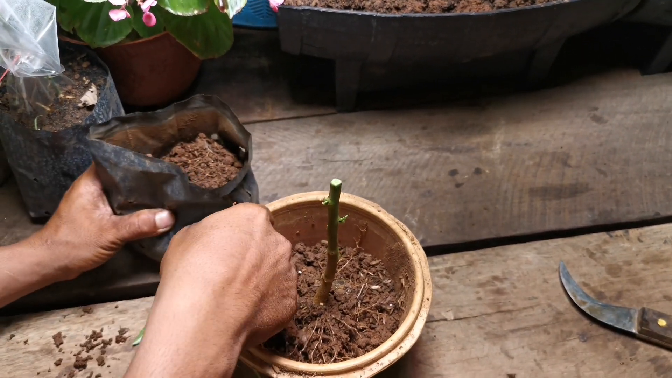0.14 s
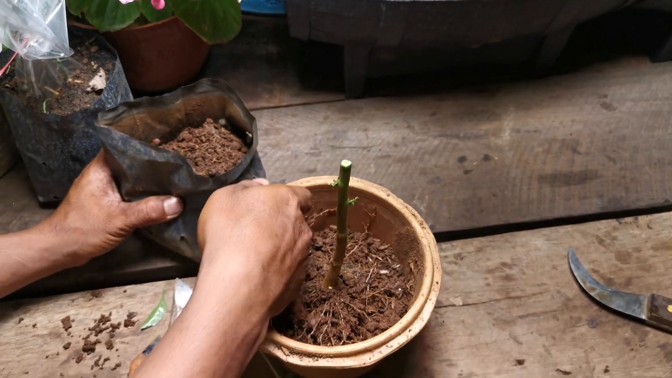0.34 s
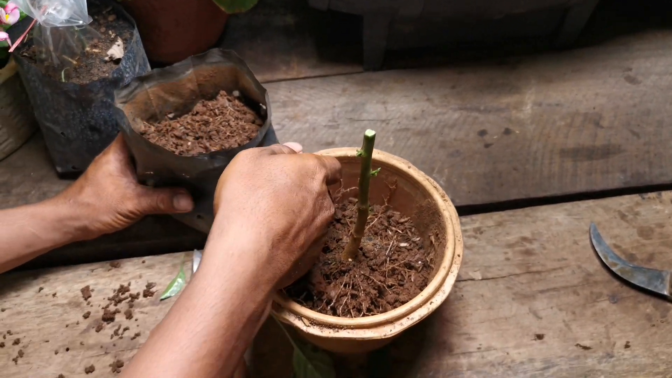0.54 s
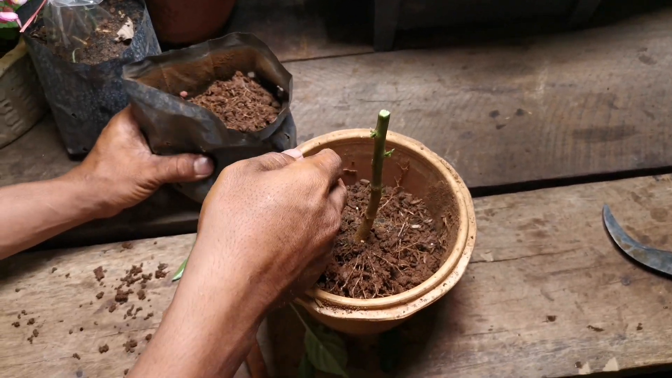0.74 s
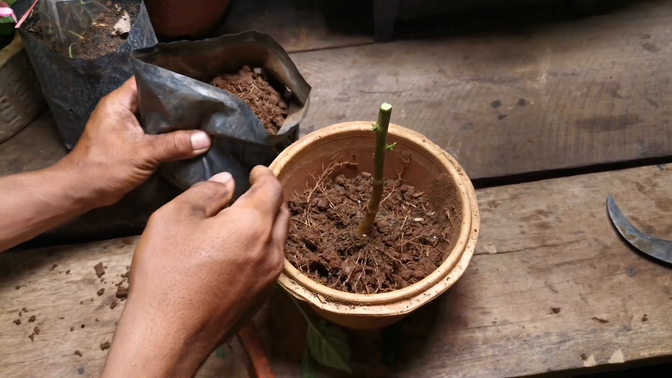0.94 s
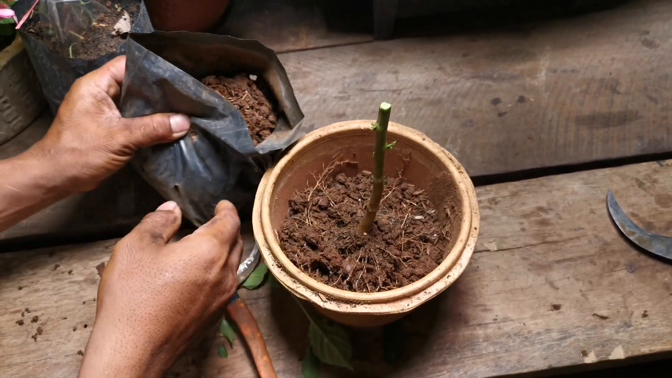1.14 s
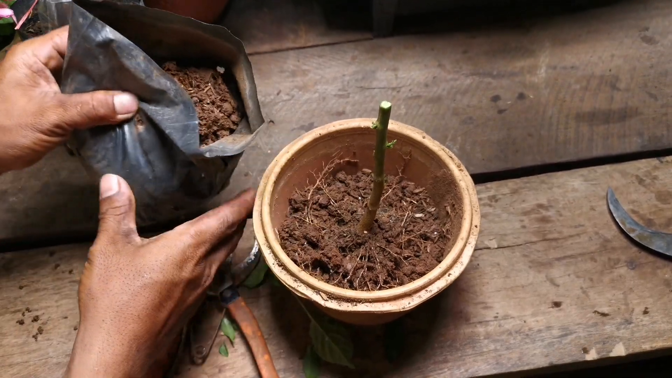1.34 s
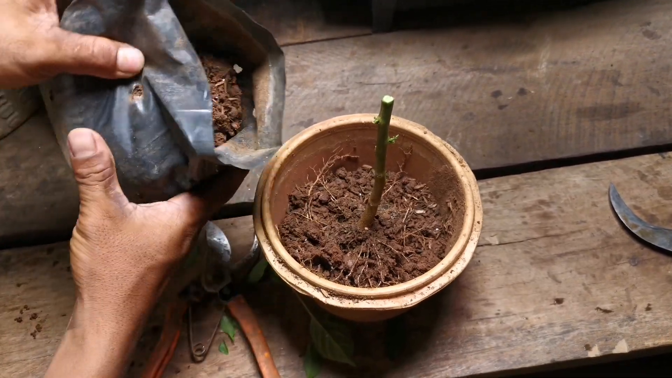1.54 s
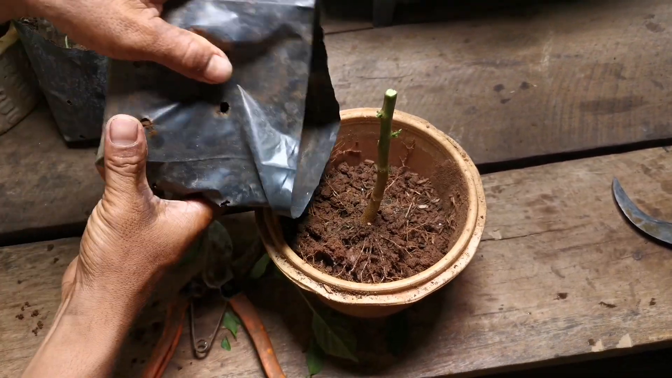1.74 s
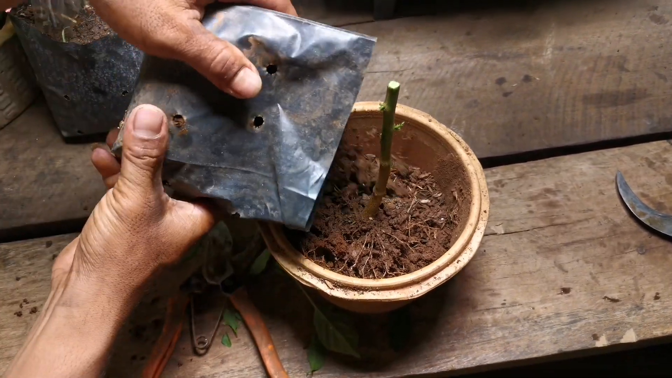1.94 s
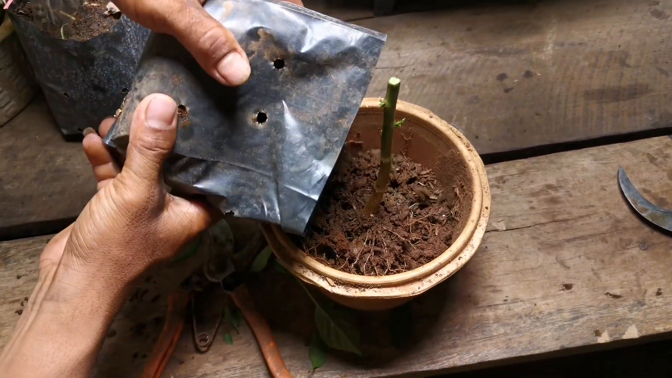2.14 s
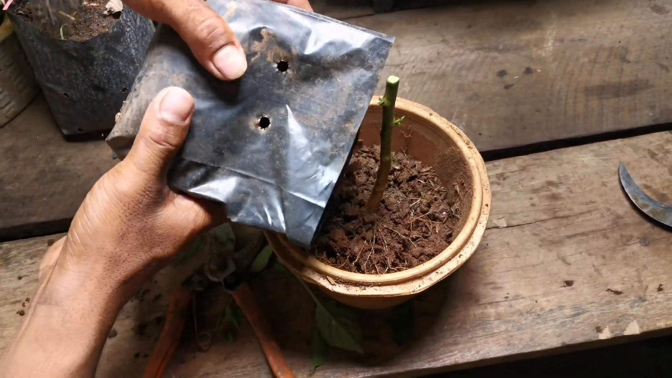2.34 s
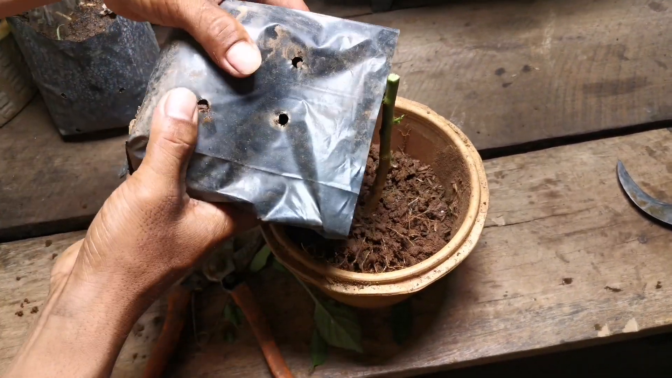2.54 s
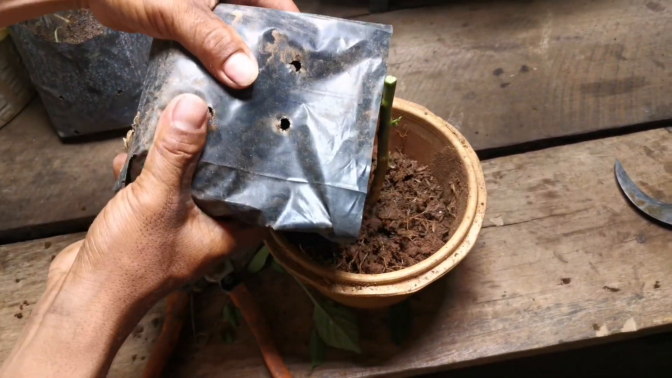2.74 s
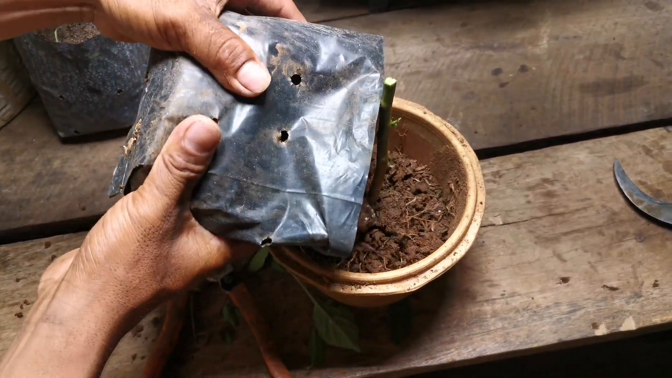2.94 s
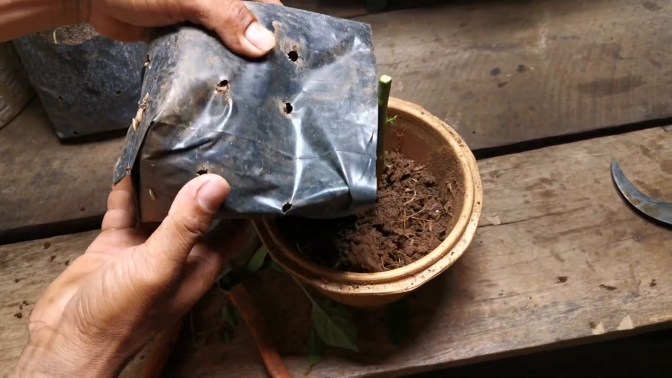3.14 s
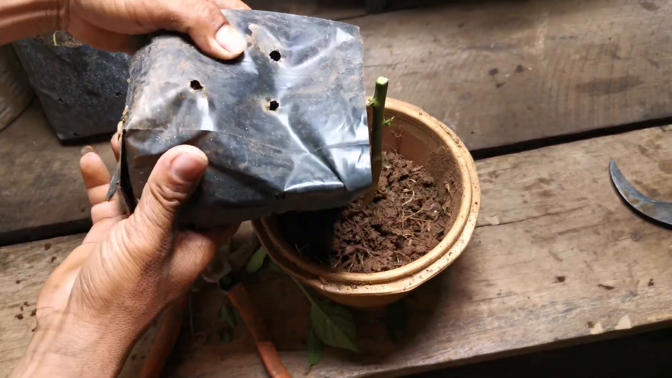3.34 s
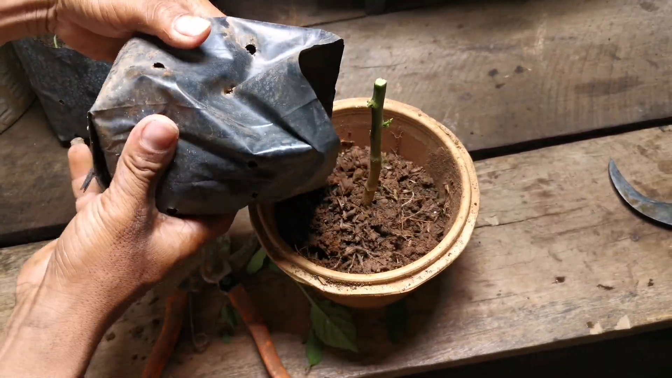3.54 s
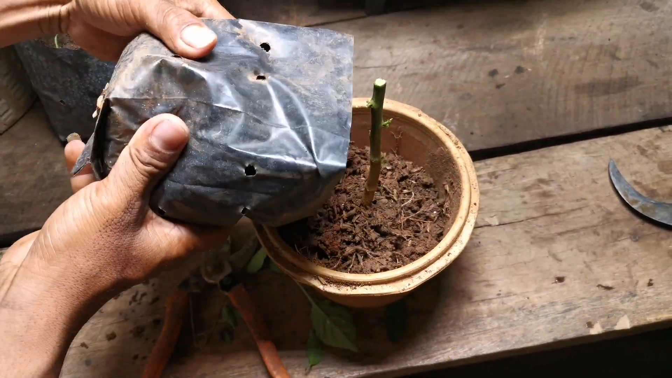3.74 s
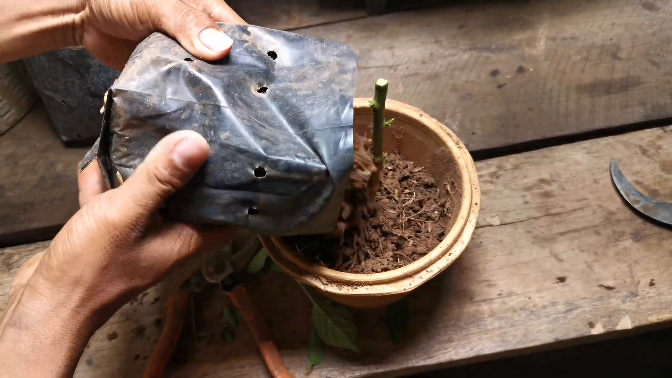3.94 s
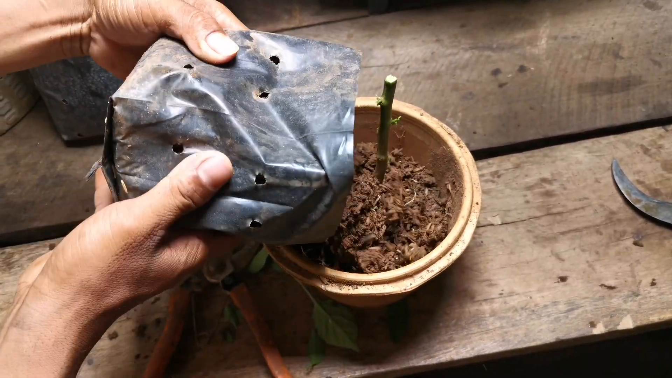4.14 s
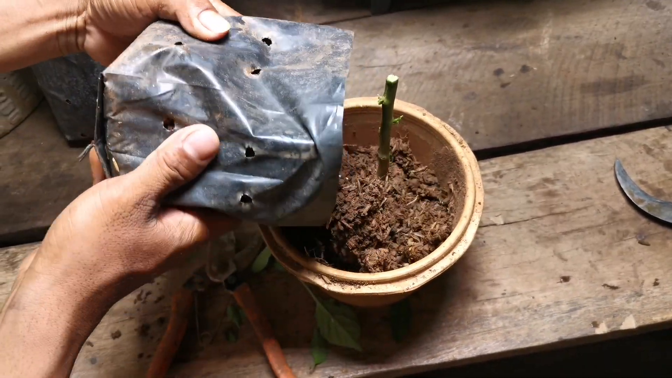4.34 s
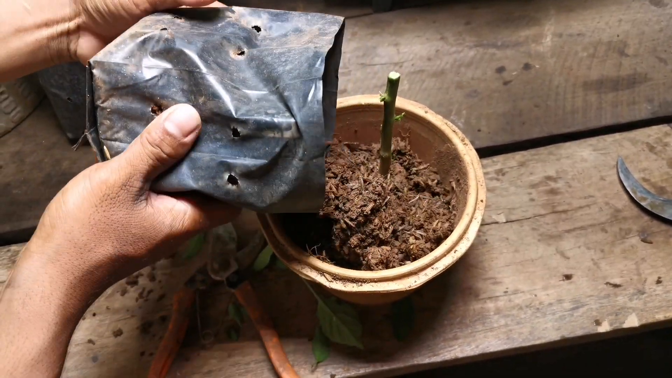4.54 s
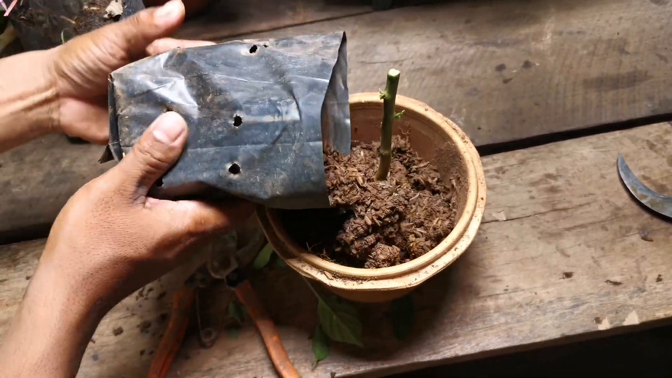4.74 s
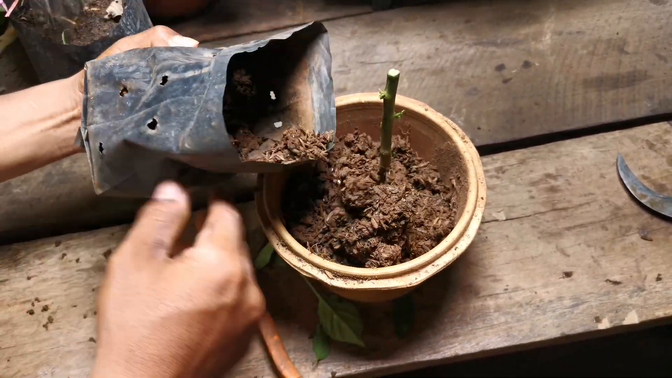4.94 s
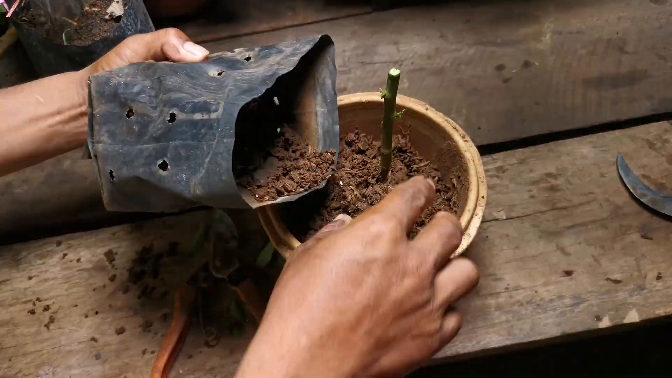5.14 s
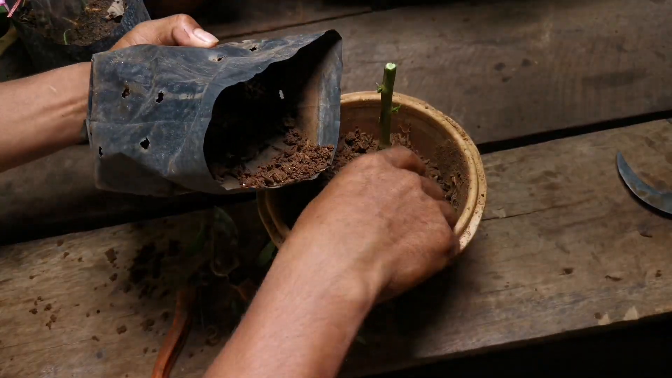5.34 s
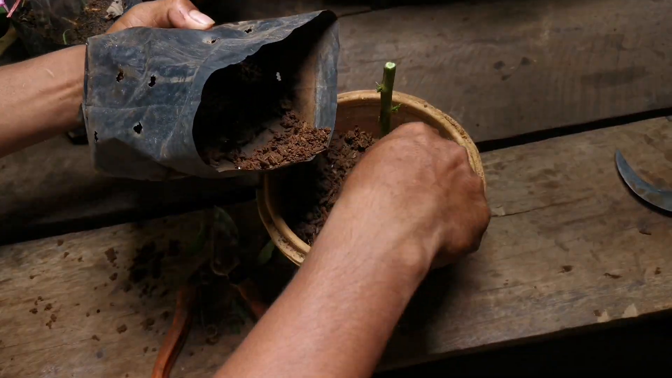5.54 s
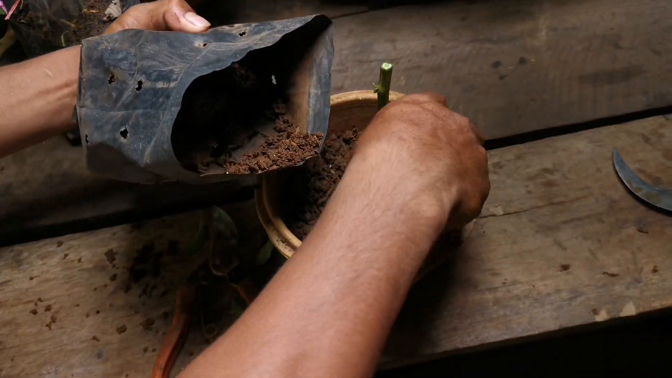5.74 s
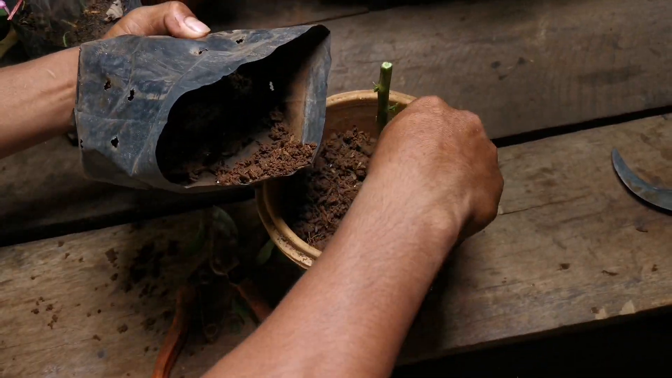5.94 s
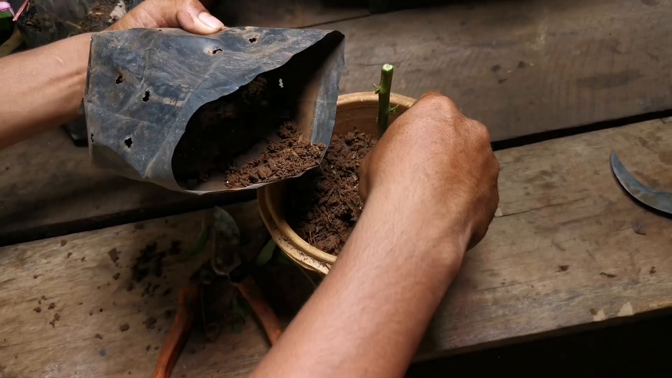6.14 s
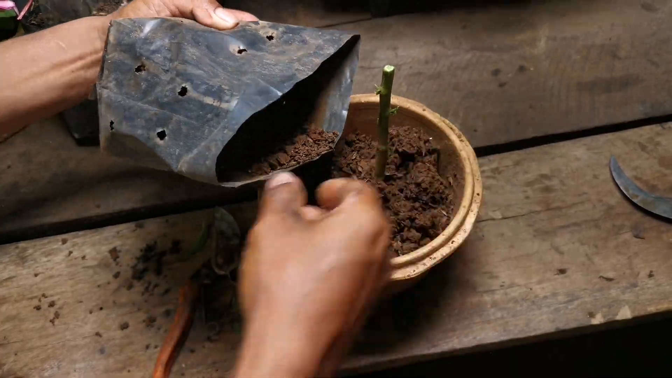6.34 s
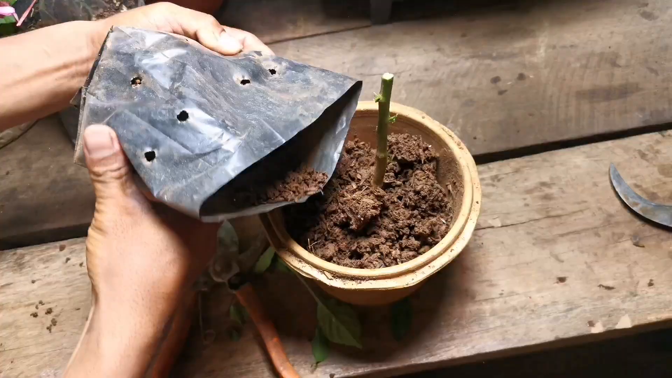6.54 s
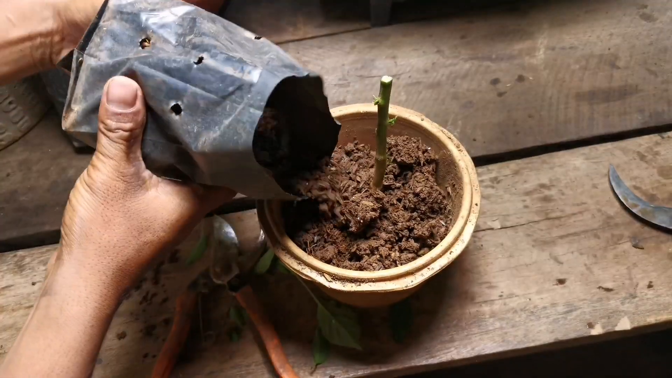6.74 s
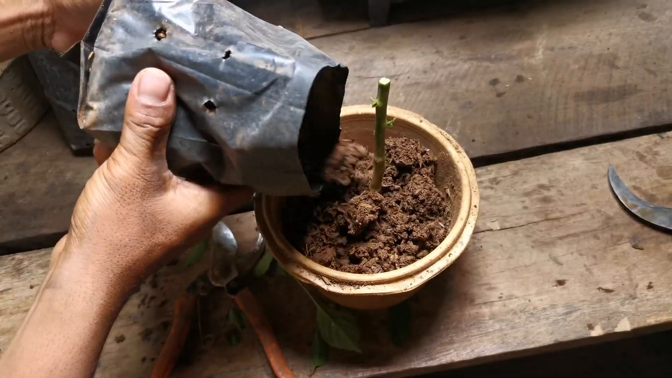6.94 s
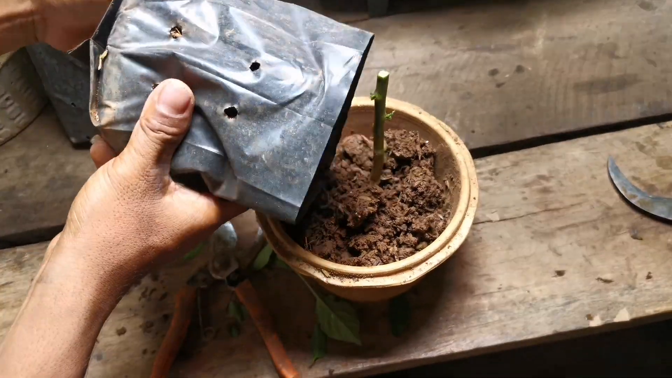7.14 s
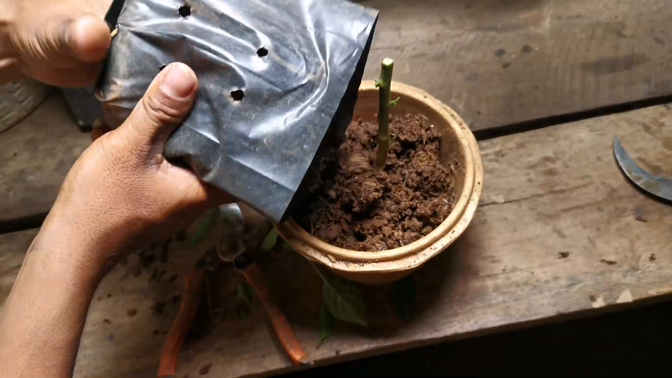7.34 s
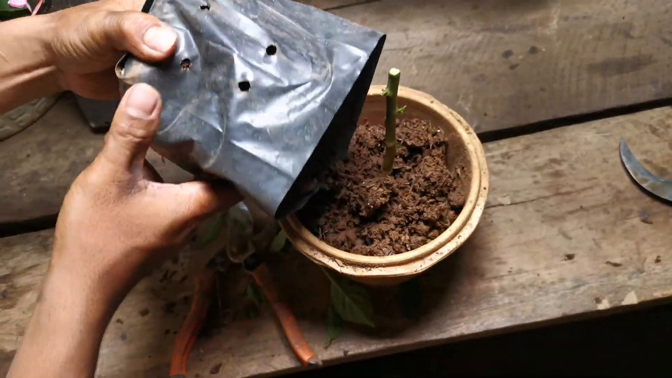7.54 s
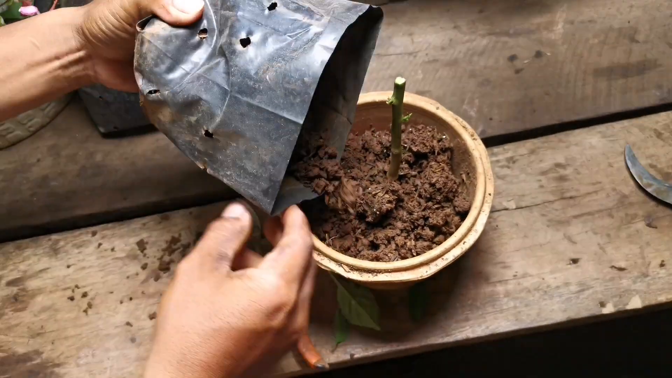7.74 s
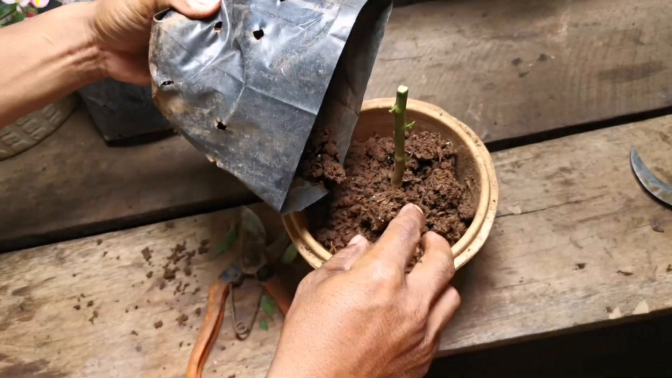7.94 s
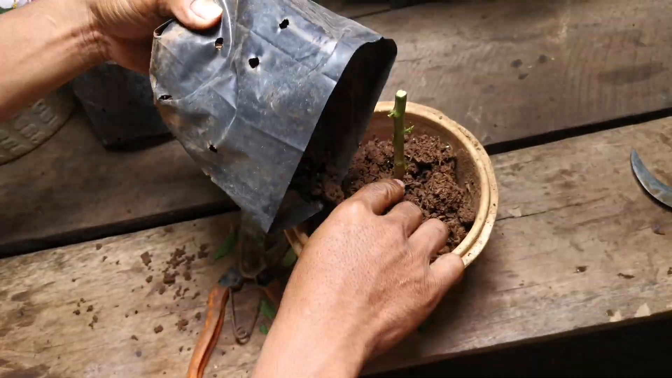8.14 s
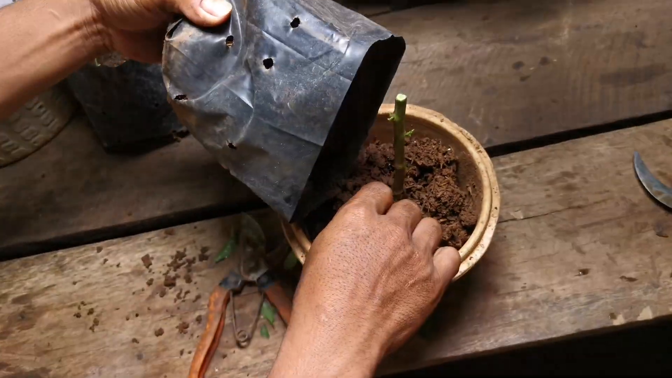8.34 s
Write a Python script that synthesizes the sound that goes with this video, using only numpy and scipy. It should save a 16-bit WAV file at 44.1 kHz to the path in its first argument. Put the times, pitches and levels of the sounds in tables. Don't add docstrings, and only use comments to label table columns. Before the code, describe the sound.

Quiet night-like outdoor air with far insects in high narrow bands, a low insect buzzing in short bouts and a faint distant engine drone. A distant frog gives soft hoarse hoots around 0.1, 0.6, 1.1 and 1.6 s, and again near 8.4. Soil rustles lightly at first; from 0.7 s the thin plastic crinkles as the bag is lifted. From 1.7 to 4.3 s crackles and snaps grow dense, with gritty soil pouring, crumbs pattering and lumps thudding dully in the pot. It eases, with a few crackles near 4.8. From 5 to 7.2 s a near cricket chirps in quick triplets, swelling, then slower and louder, over faint finger rubs on clay. Crinkling resumes at 6.5 and the last soil is shaken out until 8, then settles into light rustling. Close and dry with slight yard echo, right side only; the left carries faint hiss and occasional dull bumps.

```python
import sys
import numpy as np
from scipy import signal
from scipy.fft import rfft, irfft, next_fast_len
from scipy.io import wavfile
from scipy.ndimage import uniform_filter1d, map_coordinates

SR = 44100
rng = np.random.default_rng(int(sys.argv[2]) if len(sys.argv) > 2 else 0)


def invert_db(x):
    u = np.asarray(x, float) / 20
    return 10 ** u


def generate_wav(sig):
    pcm = np.round(np.clip(np.atleast_2d(sig).T, -1, 1) * 32767).astype(np.int16)
    wavfile.write(sys.argv[1], SR, pcm)


N = 373527
TIME = np.arange(N) / SR


def unit(x):
    return x / np.sqrt(np.mean(x ** 2) + 1e-20)


def along(points, hz):
    f, v = np.transpose(points)
    return np.interp(np.log(hz + 1), np.log(f + 1), v)


def curves(rows):
    s, *cols = np.transpose(rows)
    return [np.interp(TIME, s, c) for c in cols]


def wobble(rate):
    return map_coordinates(rng.standard_normal(400 + int(N / SR * 100)), [TIME * min(rate, 100)])


def gate(start, end, edge):
    return np.clip(np.minimum(TIME - start, end - TIME) / edge + .5, 0, 1) ** 2


def run_of(first, last, spacing):
    return np.arange(first, last + spacing / 2, spacing)


def filtered(x, response):
    m = next_fast_len(N + SR // 2)
    return irfft(rfft(x, m) * response(np.fft.rfftfreq(m, 1 / SR)), m)[..., :N]


def resonance(hz, width_hz):
    return lambda f: 1j * f * width_hz / (hz * hz - f * f + 1j * f * width_hz)


def noise_through(response):
    return unit(filtered(rng.standard_normal(N), response))


def band(hz, width_hz):
    return noise_through(lambda f: resonance(hz, width_hz)(f) ** 3)


def place(times, shapes):
    at = np.round(np.asarray(times) * SR).astype(int)[:, None] + np.arange(shapes.shape[1])
    return np.bincount(at.ravel(), shapes.ravel(), N + SR)[:N]


def grains(hz, spread, cycles, scatter_db, count, size):
    draw = rng.random((count, 2))
    pitch = np.clip(hz * np.exp(spread * rng.standard_normal((count, 1))), 60, .45 * SR)
    turns = pitch * np.arange(size) / SR
    strength = invert_db(np.minimum(-scatter_db * np.log(draw[:, 1:]), 13))
    return unit(place(draw[:, 0] * N / SR, strength * np.sin(2 * np.pi * turns) * np.exp(-turns / cycles)))


def blocked_port():
    # start_s, peak_db, swing_hz
    bumps = [
        (0.9425, -38, 43.7),
        (1.1924, -44.5, 40.8),
        (2.1355, -55, 43.7),
        (2.842, -42, 111),
        (5.2016, -43.5, 105),
        (6.4952, -43.5, 40),
        (6.979, -55, 44),
        (7.1883, -46, 44.5),
        (8.011, -36, 44.5),
        (8.2921, -44, 41.4),
    ]
    # freq_hz, density_db_per_hz
    hiss_spectrum = [(15, 17), (80, 4), (300, -2), (1200, -11), (4500, -17), (7600, -30), (8400, -41),
                     (15000, -52)]
    s, db, hz = np.transpose(bumps)[:, :, None]
    t = np.arange(3000) / SR
    swing = -np.cos(2 * np.pi * hz * t) * np.exp(-(hz * t / 1.06) ** 2.0) * (1 - np.exp(-(t / 0.00051) ** 2))
    shiver = 0.38 * np.cos(2 * np.pi * 390 * t) * invert_db(-60 * t / 0.018) * (1 - np.exp(-t / 0.0011))
    hiss = noise_through(lambda f: invert_db(along(hiss_spectrum, np.maximum(f, 5))))
    return place(s[:, 0], invert_db(db) * (swing + shiver)) + invert_db(-70.0 + 0.6 * wobble(11)) * hiss


def night_air():
    # freq_hz, density_db_per_hz
    air_spectrum = [(12, -18), (25, -22), (100, -5.5), (250, -12.5), (800, -19), (1700, -22), (4000, -27.5),
                    (7300, -13), (8200, -28), (10500, -34.5), (15000, -43.5)]
    # time_s, level_db
    drone = [(0, -66), (.61, -67.5), (.99, -60.5), (1.23, -71), (1.6, -63), (2.26, -67), (4.32, -65.5),
             (4.76, -75.5), (5.28, -64), (5.54, -74), (6.2, -65), (8.47, -75)]
    air = invert_db(-66.5 + .8 * wobble(2.8)) * noise_through(lambda f: invert_db(along(air_spectrum, f)))
    return air + invert_db(curves(drone)[0] - 1.0) * band(65.6, 69)


def chorus():
    # first_s, last_s, spacing_s, bout_s, level_db
    trills = [(0.034, .035, .3, 0.17, -61.5), (0.365, .7, 0.34, 0.19, -58.5), (1.0, 2.35, .3375, 0.17, -60),
              (2.69, 3.71, 0.38, 0.13, -61), (3.965, 4.235, 0.2, 0.23, -59),
              (4.58, 4.96, 0.42, 0.17, -60.5), (5.56, 6.27, 0.36, 0.22, -63), (6.575, 7.79, 0.3, 0.16, -64),
              (8.135, 8.135, .3, 0.3, -64.5)]
    # pitch_hz, width_hz, level_db
    far_bands = [(3000, 340, -5), (4935, 870, 1), (5920, 370, -6), (6400, 1340, -2.5)]
    bouts = sum(invert_db(db) * gate(s - bout / 2, s + bout / 2, 0.068)
                for first, last, spacing, bout, db in trills
                for s in run_of(first, last, spacing))
    trill = bouts * invert_db(1.6 * wobble(60)) * unit(band(3016, 350) + .5 * band(3227, 130))
    far = sum(invert_db(db - 63.5 + 1.5 * wobble(3.46) + 2.4 * wobble(25)) * band(hz, width)
              for hz, width, db in far_bands)
    pulses = np.cos(np.pi * 9.75 * (TIME - 5.385)) ** 6
    return trill + far + invert_db(-65) * pulses * band(7100, 260)


def frog():
    # middle_s, pitch_hz, level_db
    croaks = [(.07, 627, -63.5), (.13, 587, -64), (.59, 575, -52.5), (.66, 571, -55.5), (1.055, 577, -60),
              (1.105, 573, -59), (1.15, 573, -58), (1.555, 584, -63), (1.605, 585, -55), (1.66, 553, -61),
              (8.4, 567, -66), (8.445, 554, -61.5)]
    s, hz, db = np.transpose(croaks)[:, :, None]
    hoot_s = .078
    life = np.clip(np.arange(4000) / SR / hoot_s, 0, 1)
    hoot = np.sin(np.pi * life) * np.sin(2 * np.pi * hz * hoot_s * life)
    return place(s[:, 0] - hoot_s / 2, invert_db(db - 3.5) * hoot) * (1 + .25 * wobble(60))


def cricket():
    # first_s, last_s, spacing_s, level_db, growth_db_per_s
    chirp_runs = [
        (5.014, 6.084, .2148, -45.5, 2.5),
        (6.342, 7.109, .2552, -43, -1.5),
    ]
    # delay_s, level_db
    echo_paths = [
        (-.002, -3),
        (.0027, -7),
        (.0075, -14),
    ]
    t = np.arange(900) / SR
    life = np.clip(t / 0.0163, 0, 1)
    stroke = np.sin(np.pi * life) ** 0.46 * np.sin(2 * np.pi * np.cumsum(5150 - 800 * life) / SR)
    chirps = [(at, db + grow * (at - first))
              for first, last, spacing, db, grow in chirp_runs
              for at in run_of(first, last, spacing)]
    s, db = np.transpose(chirps)
    starts = (s[:, None] - .008 + .0405 * np.arange(3)).ravel()
    levels = (db[:, None] - 4.5 + [0, 1.5, 2.5] + rng.standard_normal((len(s), 3))).reshape(-1, 1)
    heard = sum(place(starts + late, invert_db(levels + path_db) * stroke) for late, path_db in echo_paths)
    return heard * invert_db(1.2 * wobble(100))


def yard(x):
    # freq_hz, t60_s
    decay = [(300, 0.37), (2000, 0.31), (8000, 0.13)]
    hz, t, z = signal.stft(rng.standard_normal(SR // 3), SR, nperseg=256)
    tail = signal.istft(z * invert_db(-60 * t / along(decay, hz)[:, None]), SR, nperseg=256)[1]
    return signal.fftconvolve(np.pad(x, (150, 0)), tail / np.linalg.norm(tail))[:N]


def fingers():
    # start_s, end_s, start_hz, end_hz, level_db
    rubs = [(0.245, 0.288, 1404, 1975, -61.5), (1.426, 1.462, 2400, 2290, -56),
            (1.432, 1.458, 1210, 930, -55), (5.115, 5.165, 1900, 1750, -63),
            (5.305, 5.345, 2300, 3000, -63), (5.345, 5.55, 2450, 2400, -71),
            (5.66, 5.722, 2400, 2420, -61.5), (5.722, 5.776, 2350, 2400, -59.5),
            (5.68, 5.77, 4900, 3570, -69), (5.668, 5.779, 2000, 1000, -71), (6.003, 6.045, 1650, 1150, -59),
            (6.04, 6.16, 1500, 1550, -68), (6.015, 6.14, 800, 700, -68), (8.258, 8.346, 3100, 2200, -68.5)]
    rough = band(110, 480) * invert_db(1.5 * wobble(90))
    out = np.zeros(N)
    for s, end, hz, end_hz, db in rubs:
        glide = np.sin(2 * np.pi * np.cumsum(np.interp(TIME, [s, end], [hz, end_hz])) / SR)
        out += invert_db(db + 2.5) * gate(s, end, 0.0087) * rough * glide
    return out


def sparks():
    # start_s, peak_db
    folds = [(0.9522, -56), (1.5623, -52), (1.575, -43), (1.8783, -36), (1.9205, -48), (2.0637, -36),
             (2.083, -46), (2.1485, -52), (2.8649, -53), (2.9507, -54), (3.402, -57), (3.5327, -47),
             (3.5588, -55), (3.597, -41), (3.6227, -53), (3.6461, -45), (3.6631, -48), (3.69, -39),
             (3.8724, -36), (3.998, -28), (4.2346, -58), (4.794, -35), (6.475, -45), (6.5765, -64),
             (6.9346, -48), (7.2914, -42), (7.7733, -32.5), (7.871, -47)]
    s, db = np.transpose(folds)[:, :, None]
    t = np.arange(300) / SR
    ticks = place(s[:, 0], invert_db(db + 16.0 - 60 * t / 0.0076) * rng.standard_normal((len(s), len(t))))
    return filtered(ticks, lambda f: resonance(11500, 11000)(f) ** 2)


def bag():
    lifting = [(0.682, -25.5, 3620, -10.5), (0.781, -24, 2240, -13), (0.835, -25.5, 1710, -7),
               (0.903, -31, 1740, -15), (0.972, -29.5, 3790, -5.5), (1.19, -21, 1960, -42),
               (1.428, -21.5, 2400, -68), (1.56, -31, 1710, -21), (1.575, -26.5, 1830, -3),
               (1.76, -19, 1510, -45), (1.878, -33.5, 1460, 5.5), (2.066, -17.5, 1690, -20),
               (2.084, -21.5, 1550, -2), (2.149, -22, 1580, -11)]
    pouring = [(2.453, -15, 2250, -53), (2.627, -18, 1600, -45), (2.759, -22, 2120, -44),
               (2.772, -24.5, 1120, -38), (2.775, -16, 2066, -61), (2.865, -14, 2760, -13),
               (2.922, -18, 1980, -14.5), (2.999, -12, 1710, -19), (3.028, -25, 1630, -27),
               (3.047, -23, 824, -30), (3.063, -19.5, 1500, -13), (3.219, -22.5, 1000, -10),
               (3.356, -31, 1460, -0.5), (3.401, -21, 1990, -7), (3.532, -23.5, 1000, -7),
               (3.547, -18.5, 2220, -34), (3.587, -23.5, 2090, -26), (3.619, -21.5, 2070, -30),
               (3.658, -21.5, 1570, -14), (3.689, -21, 1410, -5), (3.804, -26, 2000, -38),
               (3.833, -27, 960, -8), (3.864, -17.5, 2070, -25), (3.967, -21.5, 2470, -43),
               (3.997, -15.5, 2190, -9), (4.234, -25, 1630, -2.5), (4.272, -27.5, 1460, -17),
               (2.779, -21, 2010, -33), (2.813, -46, 3000, 4.5), (3.627, -26, 1900, -12),
               (3.741, -30, 2050, -25)]
    emptying = [(4.795, -29.5, 2530, -9), (4.832, -20.5, 1540, -9.5), (4.944, -26.5, 990, -22),
                (5.126, -41, 2520, -3), (5.153, -42, 4030, -25), (6.477, -23, 1260, -5.5),
                (6.942, -15.5, 1425, -11.5), (7.229, -32.5, 1330, 3), (7.293, -19, 2880, -25),
                (7.337, -24, 2610, -7), (7.376, -24, 960, -6.5), (7.441, -25, 3000, -6.5),
                (7.555, -27, 1810, -4), (7.609, -20.5, 1210, -4), (7.635, -17.5, 1240, -15.5),
                (7.679, -25, 2100, -20), (7.773, -17, 1950, -26), (7.871, -18.5, 2080, -9),
                (7.945, -26, 985, -23), (7.972, -28.5, 2340, -5.5)]
    more_creases = [(.024, -38, 2350, -23), (.047, -39, 3320, -4), (1.32, -38, 1160, -15),
                     (1.646, -33, 1710, -26), (2.465, -25, 1510, -10), (2.584, -30.5, 3780, -26),
                     (2.805, -29, 1970, -30), (2.932, -34.5, 2100, 11), (3.227, -24, 900, -5),
                     (3.664, -20.5, 1680, -6.5), (3.871, -17, 2100, -18), (4.249, -33, 2600, -7),
                     (4.411, -32.5, 2060, -24), (4.704, -34, 1000, -6.5), (5.171, -38.5, 850, -22),
                     (5.246, -39, 3540, -2), (5.297, -37, 850, -19), (5.192, -41, 2000, -6),
                     (6.302, -39.5, 1470, -15), (6.33, -37, 2148, -7), (6.351, -29.5, 1910, -21),
                     (6.501, -28.5, 1040, -8), (6.61, -33, 2170, -3), (6.645, -27, 1010, -0.5),
                     (6.707, -29.5, 1930, -28), (7.036, -29.5, 1510, -5), (6.682, -32, 2570, -3),
                     (7.02, -40, 1320, -5), (7.073, -34.5, 2580, -2), (7.151, -36, 1830, -8),
                     (7.189, -32, 1700, -18), (7.249, -37, 1980, 2), (7.3, -18.5, 1860, -22),
                     (7.318, -33, 2920, -22), (7.365, -28, 1940, -16), (7.507, -35.5, 910, -20),
                     (7.544, -36, 2110, -14), (7.688, -28, 1590, -15), (8.265, -38, 915, -11),
                     (8.421, -34, 2050, -16), (6.718, -34, 2000, -20), (6.726, -43, 2300, -20),
                     (6.745, -36, 960, -20), (6.773, -33, 960, -22), (7.056, -37, 1800, -20),
                     (8.023, -37, 950, -20), (8.048, -44, 2000, -14), (8.083, -42, 2400, -15),
                     (8.199, -45, 1550, -20),
                     (1.104, -36, 1370, -24), (1.382, -50, 3800, 10.5), (1.538, -39, 1820, -20),
                    (1.844, -24.5, 970, -24), (1.894, -28, 1610, -26), (1.93, -28, 1780, -15),
                    (1.97, -27, 2360, -20), (1.979, -25, 2000, -25), (1.985, -23, 1890, -27),
                    (2.019, -35, 1720, -20), (2.044, -34, 1610, -15), (2.13, -26, 1630, -26),
                    (2.188, -32, 1200, -20), (2.361, -35, 3000, -3), (2.379, -45, 2500, 10),
                    (2.405, -36, 1980, -9), (2.477, -29, 2340, -22), (2.5, -29, 2020, -22),
                    (2.617, -36, 2350, -4), (2.665, -31, 1030, -7), (2.694, -33, 1360, -13),
                    (2.735, -44, 3040, -18), (2.894, -25.5, 1470, -5), (2.951, -40, 2000, 3),
                    (3.106, -32, 1340, -25), (3.12, -30, 1900, -25), (3.136, -44, 1520, -20),
                    (3.178, -28, 1360, -25), (3.307, -37, 2200, -16), (3.33, -32.5, 1580, -17),
                    (3.367, -20.5, 1530, -11), (3.443, -31.5, 900, -21), (3.467, -30, 2750, -16),
                    (3.513, -26.5, 4060, -33), (3.575, -25, 2610, -27), (3.597, -23, 1290, -12),
                    (3.705, -30, 1010, -22), (3.733, -31, 2170, -24), (3.911, -34, 1990, -25),
                    (3.936, -31, 2100, -28), (3.954, -25, 1870, -32), (4.037, -26, 2570, -20),
                    (4.063, -26.5, 1830, -24), (4.149, -33, 900, -13), (4.211, -37, 3100, -10),
                    (4.351, -44, 3060, -22), (4.765, -30, 2500, -25), (6.456, -33, 2140, -12),
                    (6.554, -36, 3000, -9), (6.577, -29.5, 1950, -5.5), (6.632, -28.5, 1580, -1)]
    flips = lifting + pouring + emptying + more_creases
    s, db, hz, crack_db = np.transpose(flips)[:, :, None]
    t = np.arange(900) / SR
    luck = rng.standard_normal((len(s), 2))

    def partial(ratio, t60):
        return np.sin(2 * np.pi * hz * ratio * t) * invert_db(-60 * t / t60)

    def noise():
        return rng.standard_normal((len(s), len(t)))

    low = .6 * partial(.62 * np.exp(.15 * luck[:, :1]), .009)
    high = .6 * invert_db(.3 * np.minimum(crack_db + 10, 0)) * partial(1.5 * np.exp(.15 * luck[:, 1:]), .007)
    ring = low - partial(1, .0095) - high
    buzz = uniform_filter1d(noise(), size=40) * partial(1, 0.03)
    patch = place(s[:, 0], invert_db(db - 7.5) * (ring + 2.33 * buzz))
    rattle = place(s[:, 0], invert_db(db) * 0.31 * noise() * invert_db(-60 * t / 0.037))
    burst = noise() * (invert_db(-60 * t / 0.0068) + 0.12 * invert_db(-60 * t / 0.12))
    crack = place(s[:, 0], invert_db(db + crack_db + 3.0) * burst)
    return (patch + filtered(rattle, lambda f: resonance(1640, 2400)(f) ** 2)
            + filtered(crack, lambda f: resonance(7500, 10000)(f) ** 2))


def lumps():
    # start_s, peak_db, pitch_hz
    landings = [(1.851, -34, 634), (1.901, -35, 423), (2.3, -39.5, 184), (3.255, -38, 450),
                (3.349, -34, 225), (3.401, -37, 277), (3.438, -37, 283), (3.467, -38.5, 190),
                (3.535, -35.5, 296), (3.33, -38, 446), (3.83, -35, 300), (4.159, -43, 470),
                (2.354, -44.5, 320), (2.892, -40, 204), (3.213, -51, 560), (3.991, -46, 401),
                (3.505, -30.5, 540), (3.592, -37, 170), (3.732, -40, 330), (3.753, -36.5, 210),
                (3.804, -41, 575), (3.92, -35, 406), (4.032, -37.5, 580), (4.941, -37, 525),
                (7.29, -33.5, 605), (7.359, -33, 533), (7.94, -48, 580)]
    s, db, hz = np.transpose(landings)[:, :, None]
    turns = hz * np.arange(2500) / SR
    thud = np.sin(2 * np.pi * turns) * np.exp(-turns / 1.96) * (1 - np.exp(-turns / 0.39))
    return place(s[:, 0], invert_db(db + 1.5) * thud)


def soil():
    # time_s, steady_effort_db, coarseness_db
    handling = [(.3, -74, -12), (.7, -66, -1.5), (1.05, -50, -12), (1.37, -77, -2), (1.65, -58, -16.5),
                (1.9, -52.5, 0.5), (2.35, -55, -7.5), (2.85, -53.5, -5), (3.45, -59, 1), (4.12, -55.5, -1),
                (4.38, -76, -3), (5.04, -86, -5.5), (5.4, -107, -0.5), (6.0, -76.5, 3), (6.42, -69.5, -0.5),
                (6.95, -52.5, -3), (7.82, -61.5, -2.5), (8.16, -67.5, 0)]
    # peak_s, swell_s, fade_s, level_db
    slides = [(.04, 0.076, 0.031, -58.5), (.267, 0.073, 0.064, -62.5), (.595, 0.12, 0.039, -58.5),
              (1.17, 0.11, 0.16, -52.5), (1.444, 0.023, 0.065, -56.5), (1.568, 0.068, 0.03, -49.5),
              (1.77, 0.11, 0.2, -48.5), (1.855, 0.032, 0.2, -45.5), (1.99, 0.18, 0.18, -46.5),
              (2.247, 0.22, 0.12, -48.5), (2.466, 0.18, 0.31, -54.5), (2.925, 0.026, 0.02, -43.5),
              (3.02, 0.048, 0.35, -54.5), (3.217, 0.51, 0.1, -51), (3.356, 0.039, 0.081, -46),
              (3.544, 0.1, 0.82, -49.5), (3.867, 0.13, 0.031, -47), (4.061, 0.13, 0.076, -45),
              (4.16, 0.019, 0.034, -48.5), (4.287, 0.064, 0.056, -50), (4.446, 0.034, 0.36, -58.5),
              (4.79, .06, 0.22, -54.5), (4.99, 0.3, 0.05, -54), (5.15, 0.062, 0.13, -59),
              (5.32, 0.052, 0.047, -61), (5.75, 0.085, 0.032, -71), (6.48, 0.05, 0.041, -54),
              (6.625, 0.04, 0.034, -48), (6.805, 0.28, 0.068, -52), (7.311, 0.24, 0.22, -52),
              (7.691, 0.16, 0.088, -47.5), (7.97, 0.32, 0.083, -55.5)]
    # start_s, end_s, added_fizz_db
    swishes = [(0.888, 1.33, 6), (1.687, 1.844, 3), (1.864, 2.116, 3.5), (2.14, 2.293, 5),
               (2.343, 2.44, 4.5), (2.902, 2.96, -8), (3.068, 3.102, 7.5), (3.323, 3.41, 4),
               (3.523, 3.763, 1.5), (3.88, 4.12, 2), (4.407, 5.048, 2.5), (5.829, 5.976, 14),
               (6.048, 6.417, 7), (6.58, 6.675, 6), (6.744, 6.882, 8), (7.209, 7.304, 8.5),
               (7.67, 7.707, 6), (8.334, 8.459, 4)]
    steady_db, coarse_db = curves(handling)
    sliding_db = -22 + sum(db * gate(s, end, .025) for s, end, db in swishes)
    t = TIME[::64]
    surge_power = np.zeros(len(t))
    for s, swell, fade, db in slides:
        away = np.maximum((s - t) / swell, (t - s) / fade)
        surge_power += invert_db(db - 12 * away ** 2) ** 2
    effort = np.sqrt(invert_db(steady_db) ** 2 + np.interp(TIME, t, surge_power))
    extra_db = 20 * np.log10(effort) + 60
    clump = .45 * wobble(16) + wobble(45)
    clods_db = coarse_db - 1.67 + 2 * clump
    crumbs_db = .25 * extra_db - 4.5 + 2.65 * clump
    grit_db = -0.052 * extra_db + 0.64 * sliding_db + 4.5 + 2.0 * clump
    film_db = sliding_db + 20.5 + 0.92 * clump
    clods = invert_db(clods_db) * grains(707, 0.54, 0.65, 4.1, count=5000, size=400)
    crumbs = invert_db(crumbs_db) * grains(1917, 0.313, 3.8, 3.5, count=11000, size=250)
    grit = invert_db(grit_db) * grains(5020, 0.374, 2.0, 5.6, count=20000, size=90)
    film = invert_db(film_db) * grains(10720, 0.13, 1.77, 2.5, count=45000, size=40)
    return effort * (clods + crumbs + grit + film)


def scene():
    # freq_hz, gain_db
    mic_tone = [(100, -10.5), (400, -5), (930, -1), (1250, -4.5), (2000, -0.5), (4000, 1.5), (7000, 1.5),
                (8200, -16.5), (9300, -16.5), (10500, -27.5), (15000, -24)]
    near = soil() + lumps() + bag() + fingers() + sparks()
    near = filtered(near + invert_db(-17) * yard(near), lambda f: invert_db(along(mic_tone, f)))
    song = cricket()
    song = song + invert_db(-8.5) * yard(song)
    return np.array([blocked_port(), 2 * (near + song + frog() + chorus() + night_air())])


def low_pass(x):
    return signal.sosfilt(signal.butter(12, 16400, fs=SR, output="sos"), x)


def record(dry):
    dull = filtered(dry, lambda f: np.where(f < 15150, 1, invert_db(-32)))
    return low_pass(dull - [[.0001], [.0002]])


dry = scene()
out = record(dry)
generate_wav(out)
```